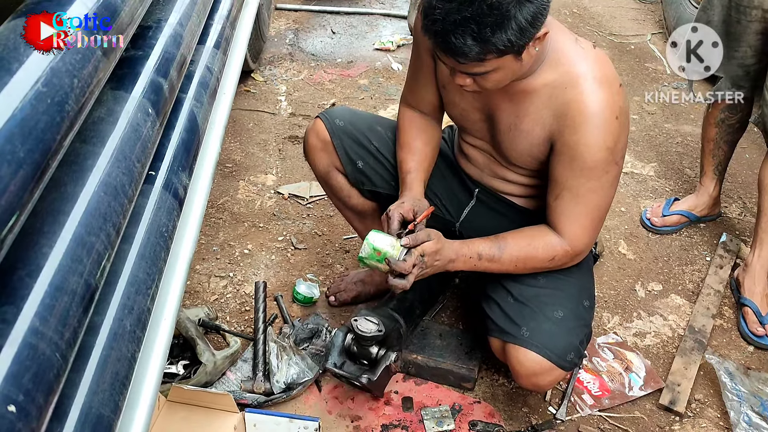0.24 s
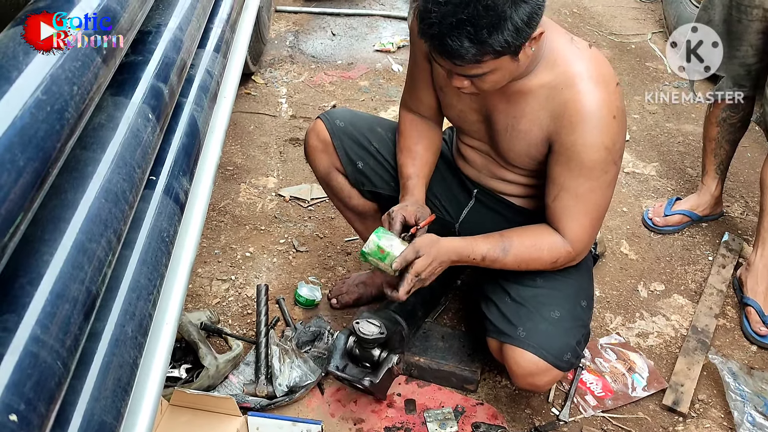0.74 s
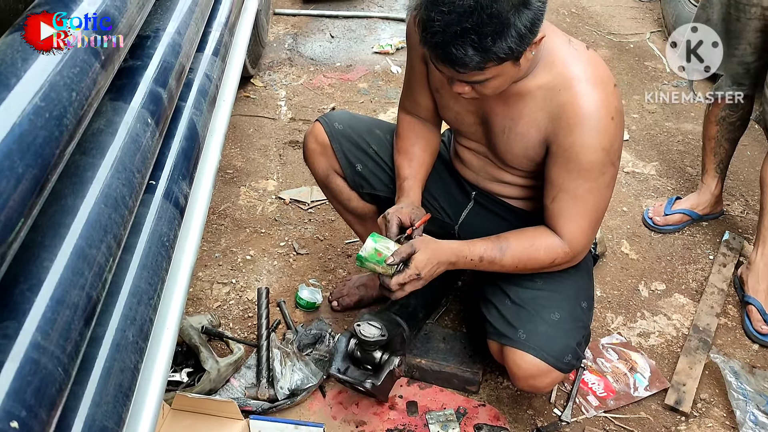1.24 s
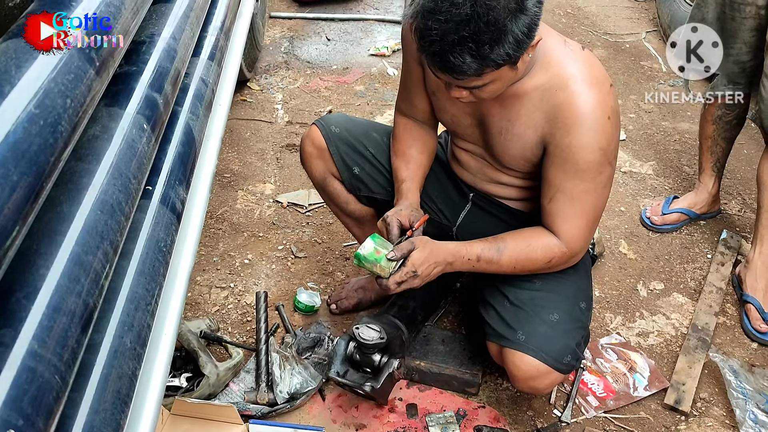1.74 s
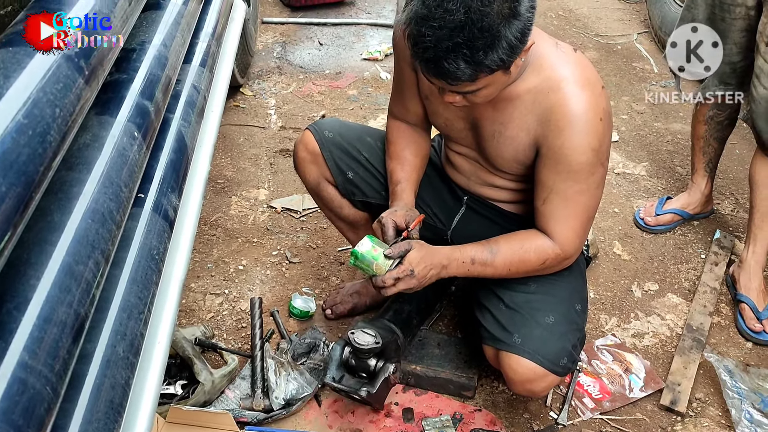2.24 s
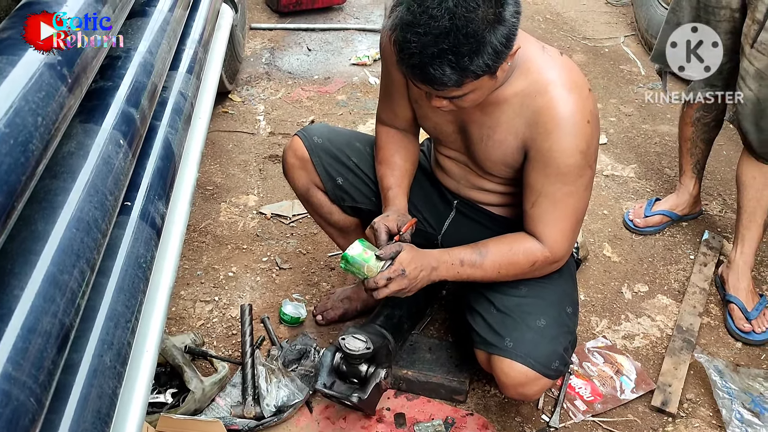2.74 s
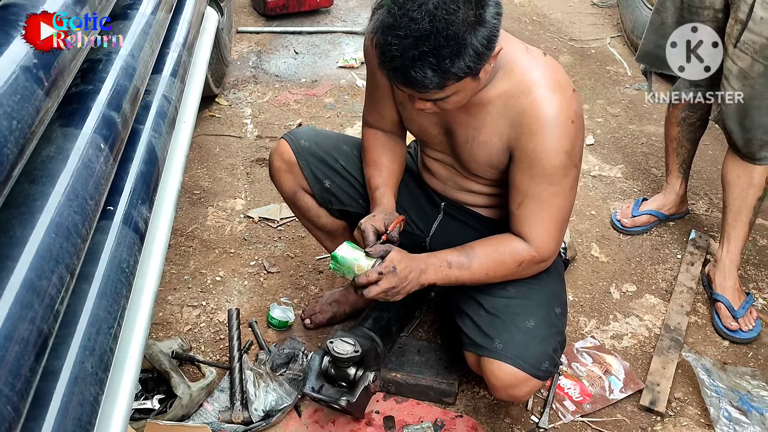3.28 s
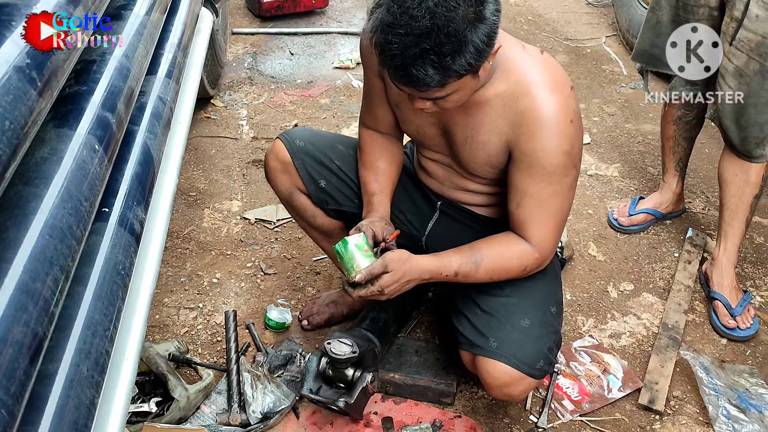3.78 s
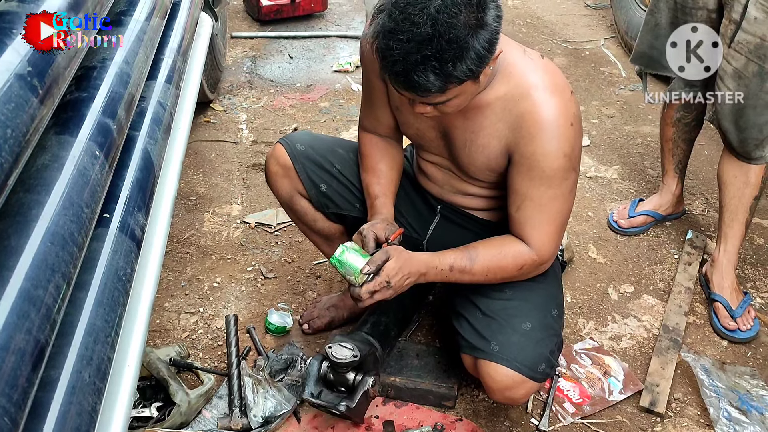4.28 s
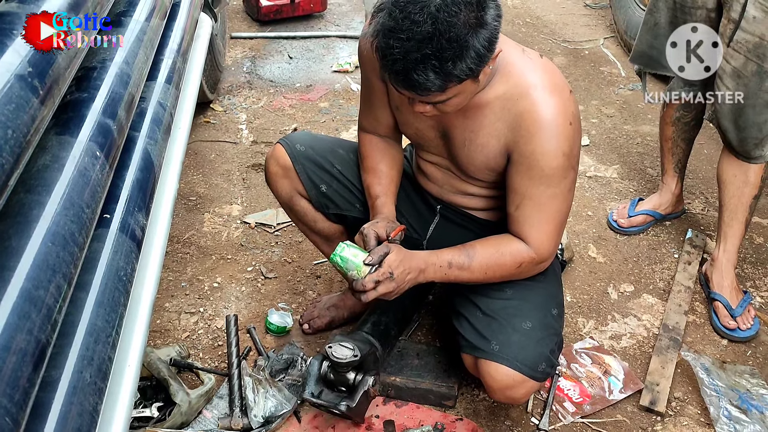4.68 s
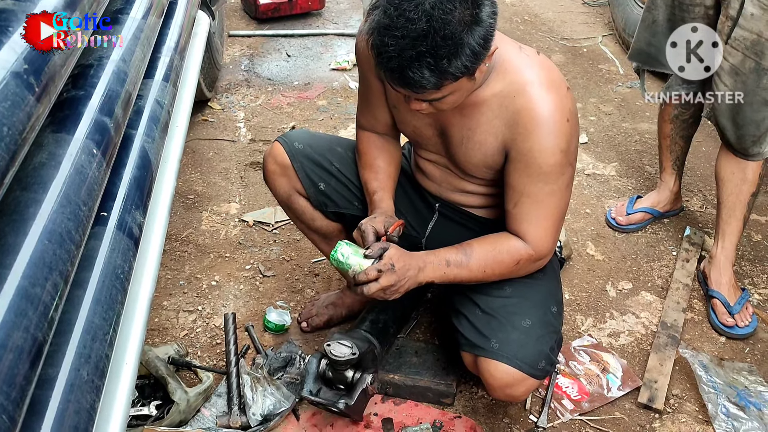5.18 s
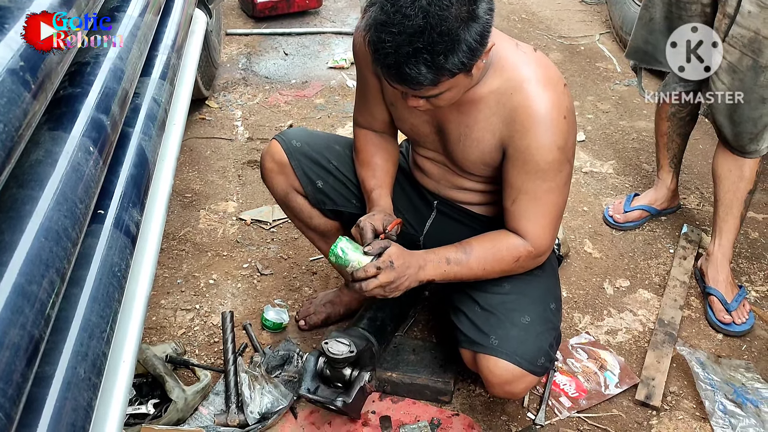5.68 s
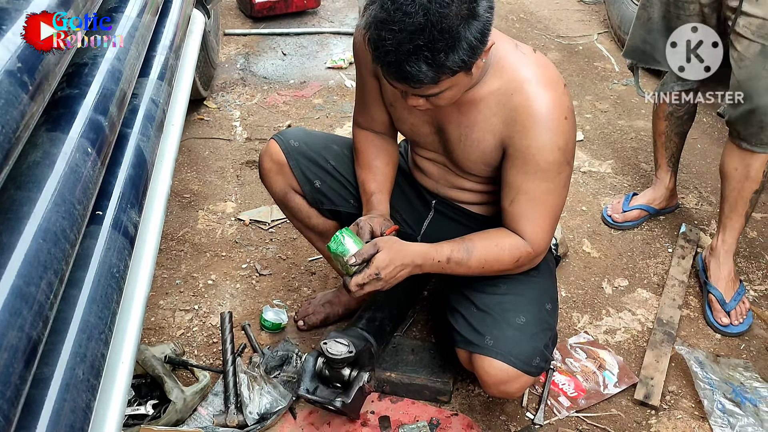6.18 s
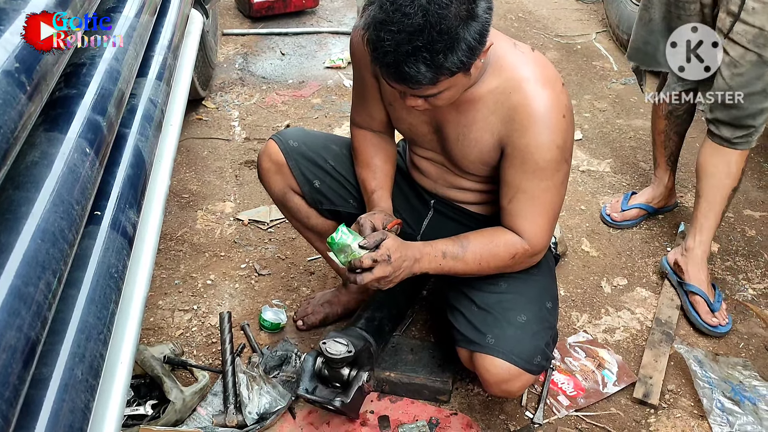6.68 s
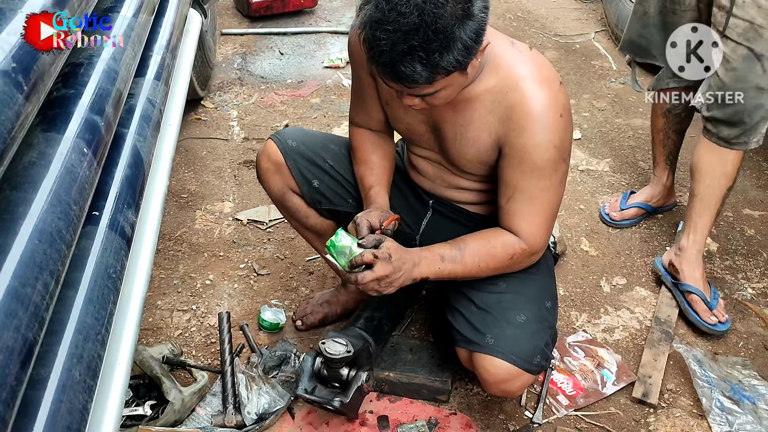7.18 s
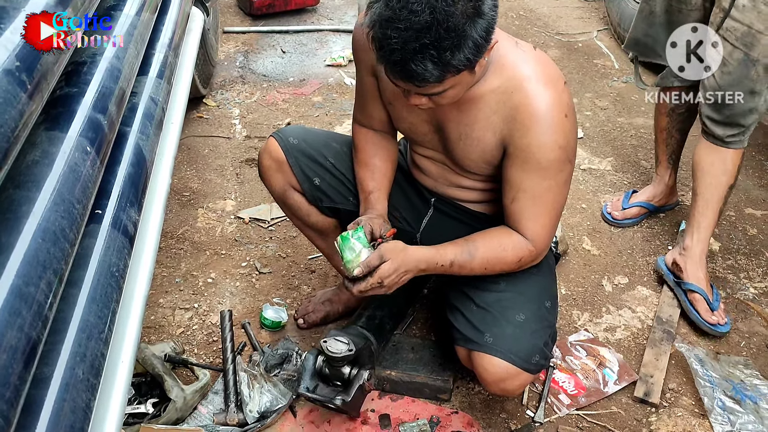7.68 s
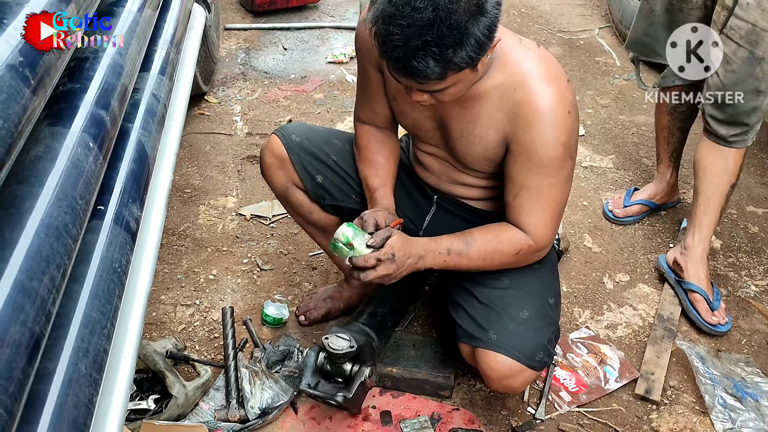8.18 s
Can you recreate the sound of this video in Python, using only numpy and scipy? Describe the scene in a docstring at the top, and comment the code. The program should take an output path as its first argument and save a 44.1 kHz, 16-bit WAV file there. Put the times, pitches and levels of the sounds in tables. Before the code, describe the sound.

Hand scissors snip and crunch a thin metal drink can in irregular bursts, loudest later, over faint traffic rumble, with one brief distant horn honk.

```python
"""Hand scissors cut up a thin drink can in a yard, over filtered-noise traffic and a wavering low hum.
From the start the sheet snaps and soon crunches: noise bursts ring its modes, then the can, and walls answer.
A vehicle swells by as dull noise, small ticks follow, and a distant horn honks once on two notes.
Later the wall pops in with dull thuds, a blade squeaks with a rising pitch, and the long last cut
scrapes as uneven noise with pinging burrs."""
import sys
import numpy as np
from scipy import signal
from scipy.fft import rfft, irfft, next_fast_len
from scipy.io import wavfile

SR = 44100
rng = np.random.default_rng(int(sys.argv[2]) if len(sys.argv) > 2 else 0)


def output_pcm(signal):
    """Save a mono or channel-first signal as 16-bit PCM at the path in sys.argv[1].

    Samples are clipped to [-1, 1] before scaling.
    """
    pcm = np.clip(np.atleast_2d(signal).T, -1, 1) * 32767
    wavfile.write(sys.argv[1], SR, np.round(pcm).astype(np.int16))


N = 371763
TIME = np.arange(N) / SR


def from_db(db):
    """Turn decibels into a gain."""
    return 10 ** (np.asarray(db) / 20)


def rms_one(x):
    """Scale a sound to an rms of 1."""
    return x / np.sqrt(np.mean(x ** 2) + 1e-20)


def in_time(rows):
    """Draw straight lines between the points of a table, giving a value at every sample."""
    return np.interp(TIME, *np.transpose(rows))


def in_time_or_silent(times, level_db):
    """Gain that follows a level curve [dB] and is practically silent outside it."""
    return from_db(np.interp(TIME, times, level_db, left=-200, right=-200))


def at_hz(points, hz):
    """Read a spectrum table on a log-frequency axis."""
    points = np.array(points)
    return np.interp(np.log(hz + 1e-9), np.log(points[:, 0]), points[:, 1])


def band(x, low, high, order=2):
    """Keep the frequencies between low and high [Hz]."""
    sos = signal.butter(order, [low, min(high, .48 * SR)], "band", fs=SR, output="sos")
    return signal.sosfilt(sos, x + 1e-18)


def add(out, s, sound):
    """Mix a stereo sound in at time s [s], trimmed to fit."""
    start = round(s * SR)
    first, last = max(start, 0), min(start + sound.shape[1], N)
    out[:, first:last] += sound[:, first - start:last - start]


def drift(rate):
    """Random wandering with spread 1, taking a new value rate times a second."""
    knots = rng.standard_normal(2000)
    return rms_one(np.interp(TIME * rate, np.arange(len(knots)), knots))


def resonate(x, hz, width):
    """Ring one resonance of a given width [Hz], with gain 1 at its peak."""
    r = np.exp(-np.pi * width / SR)
    top = (1 - r * r) / 2 * np.array([1, 0, -1])
    return signal.lfilter(top, [1, -2 * r * np.cos(2 * np.pi * hz / SR), r * r], x)


# how alike noise is at the left and right: (frequency [Hz], correlation)
STEREO_LIKENESS = [(60, 0.95), (150, 1), (300, 0.9), (600, 0.66), (1200, -0.38), (5000, 0.062)]


def coloured_noise(spectrum):
    """Stereo noise with a given spectrum, alike in the bass and nearly unrelated in the treble."""
    size = next_fast_len(N)
    hz = np.fft.rfftfreq(size, 1 / SR)
    mid, side = rfft(rng.standard_normal((2, size)))
    alike = np.clip(at_hz(STEREO_LIKENESS, hz), -.99, .99)
    pair = np.sqrt(1 + alike) * mid + np.sqrt(1 - alike) * side * [[1], [-1]]
    shaped = pair * from_db(at_hz(spectrum, hz)) * hz / (hz + 10)   # the last factor thins the deepest bass
    return rms_one(irfft(shaped, size)[:, :N])


# colour of the traffic rumble: (frequency [Hz], relative level [dB per Hz])
TRAFFIC_COLOUR = [(12, -21.5), (20, 6.5), (38, 2), (118, -5), (152, -4.5), (243, -10.5), (283, -19.5),
                  (330, -20), (430, -16.5), (730, -120)]
# colour of the thin outdoor hiss: (frequency [Hz], relative level [dB per Hz])
AIR_COLOUR = [(12, -42), (20, -30.5), (48, 17.5), (162, -15), (232, -9.5), (438, -24.5), (739, -30),
              (922, -26.5), (1390, -31.5), (2850, -39.5), (3970, -43), (6700, -49.5), (9590, -56),
              (13300, -40.5), (14500, -39)]
TRAFFIC_DB, AIR_DB = -47.5, -60   # average levels


def outdoors():
    """Far traffic is low noise that swells gently; outdoor air is a thin hiss above it."""
    rumble = rms_one(band(coloured_noise(TRAFFIC_COLOUR), 15, 307, order=4))
    rumble = from_db(TRAFFIC_DB + 1.3 * drift(8.0)) * rumble
    air = rms_one(band(coloured_noise(AIR_COLOUR), 313, 11000, order=3))
    air = from_db(AIR_DB + .5 * drift(6.1)) * air
    return rumble + air


# strength of the distant engine's hum: (time [s], level [dB])
ENGINE_HUM_LEVEL = [(0, -61), (4.0, -68.5), (4.6, -56), (6.8, -61), (8.43, -65)]
HUM_HZ, HUM_WANDER = 168.6, 0.02485   # middle pitch; spread of the pitch as a fraction of it


def hum():
    """One low note of a far engine wavers in pitch and strength."""
    phase = 2 * np.pi * np.cumsum(HUM_HZ * (1 + HUM_WANDER * drift(12))) / SR
    return from_db(in_time(ENGINE_HUM_LEVEL) + 1.0 * drift(7.1)) * np.sin(phase)


# blades sliding on the sheet in the long last cut: (time [s], level [dB])
SLIDE_LEVEL = [(6.08, -72), (6.84, -54.5), (7.27, -74), (7.43, -80), (7.58, -60), (8.23, -97), (8.43, -44)]
# colour of the rubbing: (frequency [Hz], relative level [dB per Hz])
RUB_COLOUR = [(290, -33.5), (500, 0.5), (1030, -38), (1120, 0), (1730, -1), (2420, 1.5), (3910, -8.5),
              (6590, -7), (14500, -24.5)]
# before the slide, the can only shifts faintly in the fingers
HANDLING_DB, HANDLING_SWING_DB, HANDLING_CHANGES_PER_S = -69.5, 3, 8
BURRS_PER_S, BURR_SPREAD_DB = 25, 5.5   # average rate at each pitch; spread of their sizes


def slide():
    """Steel scrapes along the cut edge with uneven grip and catches on burrs, which ping."""
    grip_db = 1.0 + 0.52 * drift(49) + 3.03 * drift(200)
    rub = from_db(grip_db) * coloured_noise(RUB_COLOUR)
    burrs = np.zeros((2, N))
    sizes = from_db(BURR_SPREAD_DB * np.minimum(rng.exponential(1, N), 2))
    for hz in np.geomspace(1100, 5500, 16):
        catches = (rng.random(N) < BURRS_PER_S / SR) * sizes
        ping = resonate(catches, hz * rng.uniform(.95, 1.05), 40)
        burrs += rng.uniform(.3, 1, (2, 1)) * rng.choice([-1, 1], (2, 1)) * ping
    slide_start = SLIDE_LEVEL[0][0]
    handling_db = HANDLING_DB + HANDLING_SWING_DB * drift(HANDLING_CHANGES_PER_S)
    level_db = np.where(TIME < slide_start, handling_db, in_time(SLIDE_LEVEL))
    return from_db(level_db) * (rub + from_db(2.0) * rms_one(burrs) * (TIME > slide_start))


def flex(shake, wall_hz, flap_hz):
    """Grip and cut change the shape of the sheet, so its wall and loose flap ring differently every time."""
    wall = resonate(shake, wall_hz, 110)
    flap = resonate(shake, flap_hz, 290)
    out = shake + from_db(8) * wall + from_db(8.5) * flap
    for hz in np.geomspace(2200, 13000, 9) * np.exp(.12 * rng.standard_normal(9)):
        out = out + from_db(6.5) * resonate(shake, hz, 105)
    return out


# borders between the body, can, edge and fizz ranges: (frequency [Hz])
RANGE_EDGES_HZ = [300, 850, 2000, 7000, 15500]
# A sharp break puts its energy into fizz, a blunt buckle into the can.
# starting levels of the can, edge and fizz ranges, relative to the cut: (level [dB])
RANGE_LEVELS_DB = [-4, 0.5, -12]
# how sharpness changes those ranges: (level gained per dB of sharpness [dB])
SHARPNESS_EFFECT = [-0.78, 0.023, 1.195]
BODY_DB, BODY_FOLLOWS = -44.5, 0.4   # the hand damps the low body, which grows little with the level
LEAD_S = .1   # a fracture peaks this long after its start


def fracture(row, swell, grain_db, after_db, after_t60, band_db):
    """A run of tiny slips shakes the dense modes of the sheet, swelling to a peak and then dying away."""
    level_db, sharpness_db, wall_hz, flap_hz, t60 = row
    body_db = BODY_DB + BODY_FOLLOWS * level_db
    upper_db = level_db + np.add(RANGE_LEVELS_DB, sharpness_db * np.array(SHARPNESS_EFFECT))
    levels_db = np.add([body_db, *upper_db], band_db)
    t = np.arange(SR // 2) / SR - LEAD_S
    since = np.maximum(t, 0)
    # a main fall and a weaker aftermath
    fall = np.hypot(from_db(-60 * since / t60), from_db(after_db - 60 * since / after_t60))
    shape = np.exp(np.minimum(t, 0) / max(swell, 1e-4)) * fall
    grain = np.interp(np.arange(len(t)) / 50, np.arange(500), rng.standard_normal(500))
    slips = from_db(grain_db * grain)
    shake = flex(rng.standard_normal((2, len(t))) * slips * shape, wall_hz, flap_hz)
    parts = zip(levels_db, RANGE_EDGES_HZ, RANGE_EDGES_HZ[1:])
    mix = sum(from_db(db) * rms_one(band(shake, low, high, order=4)) for db, low, high in parts)
    return mix * np.sqrt(np.mean(shape ** 2))


CRACK_DB = 7.5   # force of the first click, relative to the level of the cut


def crack(force_db):
    """The instant at which the metal gives: a click of about a millisecond."""
    t = np.arange(SR // 200) / SR
    click = band(rng.standard_normal((2, len(t))), 1200, 12000)
    return from_db(force_db - 31.5 - 60 * t / 0.0031) * click


# the sheet snaps: (time [s], level [dB], sharpness [dB], wall pitch [Hz], flap pitch [Hz],
# time of the main fall by 60 dB [s])
SHEET_SNAPS = [(.002, -44, -0.5, 955, 3120, .11), (0.214, -44, 0, 1620, 5070, 0.16),
               (.432, -47, -10.5, 990, 2820, .07), (.65, -52.5, 2, 1470, 2620, 0.11),
               (1.122, -38, 7, 940, 7000, 0.075), (1.394, -53.5, -10, 930, 3160, 0.17),
               (1.455, -37, -0.5, 1660, 3720, 0.055), (1.699, -35, 1, 1660, 3280, 0.08),
               (1.746, -24, 8.5, 920, 3880, 0.032), (1.814, -46.5, -6.5, 980, 2830, 0.18),
               (1.984, -47.5, 13.5, 1840, 4960, 0.066), (2.057, -31, 6.5, 1790, 2500, .09),
               (2.74, -52, -10, 920, 3500, .085), (2.788, -50, -7.5, 1060, 2760, 0.11),
               (2.815, -44.5, -13.5, 2080, 2250, 0.18), (2.863, -49, 9.5, 940, 2030, 0.13),
               (3.006, -42.5, 1.5, 1050, 2610, .07), (3.104, -38.5, -6, 1100, 2570, 0.2),
               (3.151, -34, -1, 1090, 3780, 0.084), (3.197, -36, -11.5, 1190, 3050, 0.081),
               (3.271, -27.5, 1.5, 2020, 3770, 0.07), (3.342, -35.5, 8, 2100, 5060, 0.029),
               (3.573, -38, 6.5, 1080, 4240, 0.064), (3.601, -28.5, 4, 1180, 3720, .1),
               (4.417, -41.5, 5, 1520, 5460, 0.027), (4.459, -49.5, 7, 1130, 6310, 0.046),
               (4.503, -36.5, 4, 1120, 2100, 0.086), (4.799, -34, 3, 2100, 3420, 0.04),
               (5.255, -39, -13, 1570, 3020, 0.054), (5.432, -17.5, 9, 2110, 4270, 0.036),
               (5.692, -41, -14, 1136, 2170, 0.39), (5.713, -22.5, 9.5, 1170, 3340, 0.075),
               (5.744, -25.5, 7.5, 1970, 2030, 0.12), (5.841, -15.5, 9.5, 1734, 5240, 0.037),
               (6.392, -32, 2.5, 1920, 3860, 0.018), (6.49, -43.5, -11, 1190, 2500, 0.029),
               (6.527, -47.5, -4, 2000, 4280, 0.034), (6.606, -39, 2.5, 1340, 2520, 0.086),
               (6.714, -29.5, 4, 1240, 4150, .11), (6.899, -48.5, 10.5, 1600, 4730, 0.046),
               (7.0, -32, 3.5, 1130, 4800, 0.11), (7.4, -28, 6.5, 1570, 4740, 0.089),
               (7.409, -21.5, 11, 1720, 4360, 0.078), (7.518, -40.5, 2.5, 1125, 4200, .1),
               (7.569, -41, 5.5, 1110, 6560, 0.052), (7.623, -37.5, 4, 1140, 6200, 0.058),
               (7.745, -43.5, 3.5, 1430, 2540, 0.36), (7.855, -43.5, 3, 1250, 3830, 0.51),
               (8.089, -43, 2, 975, 3450, 0.034), (8.228, -25.5, 0.5, 1560, 6500, 0.17)]


def snaps():
    """The metal gives way suddenly: a click and a fracture that swells in about a millisecond."""
    out = np.zeros((2, N))
    for s, *row in SHEET_SNAPS:
        snap = fracture(row, swell=0.00097, grain_db=1.0, after_db=-7, after_t60=0.11,
                        band_db=[6.8, 1.34, -0.53, -1.1])
        add(out, s - LEAD_S, snap)
        add(out, s, crack(row[0] + CRACK_DB))
    return out


# resonances of the can and blades: (frequency [Hz], width before a lower limit [Hz], level [dB])
CAN_RESONANCES = [(916, 8.1, 8), (1114.3, 27.4, 4.5), (1330, 55, -1.5), (1510, 63, -4.5), (1634, 20, 6.5),
                  (1970, 17, -20), (2462, 22, -3.5), (2680, 25, -5.5), (2933, 50, 5.5), (3439, 124, 6),
                  (4510, 38, -17), (4460, 146, 7.5), (5396, 85, 0), (6380, 85, -17), (6735, 67, 2),
                  (7300, 100, -36)]


def can(shake):
    """The shaken can rings at its resonances, each heard slightly later on the right."""
    out = 0.9 * shake
    for k, (hz, width, db) in enumerate(CAN_RESONANCES):
        ring = resonate(shake[k % 2], hz, max(width, hz / 75))   # left and right drive them in turn
        late = np.interp(TIME - .00078, TIME, ring)
        out += from_db(db) * np.array([ring, late])
    return out


def yard(x, wet_db, t60, dull_hz):
    """Walls and clutter scatter a faint, duller tail."""
    t = np.arange(SR) / SR
    echoes = band(rng.standard_normal((2, SR)), 320, dull_hz, order=1)
    echoes = echoes * from_db(-60 * t / t60) * (1 - np.exp(-t / 0.0017))
    tail = signal.fftconvolve(x, rms_one(echoes) / np.sqrt(SR), axes=1)[:, :N]
    return x + from_db(wet_db) * tail


# the sheet crumples: (time [s], level [dB], sharpness [dB], wall pitch [Hz], flap pitch [Hz],
# time of the main fall by 60 dB [s], swell time [s])
SHEET_CRUNCHES = [(.774, -59, 2, 1470, 2200, .27, .007), (.888, -58.5, -2.5, 995, 2050, 0.13, 0.0087),
                  (2.454, -62.5, -2, 1360, 2320, 0.22, .007), (2.941, -55.5, -1, 945, 2300, 0.07, 0.0034),
                  (3.701, -55, -1.5, 1120, 4270, 0.32, 0.0043), (4.654, -51.5, 0.5, 1530, 3900, 0.15, .015),
                  (4.924, -54.5, -3, 1060, 3700, 0.16, 0.011), (5.088, -37, 6, 1560, 5450, 0.082, 0.012),
                  (5.417, -60.5, -21.5, 1065, 3000, 0.089, 0.0023),
                  (5.471, -31.5, 0, 1610, 2760, 0.095, 0.0061), (6.241, -48, 0.5, 1120, 6000, 0.26, 0.04),
                  (6.803, -40.5, 3.5, 1100, 4200, 0.14, 0.012), (7.146, -48.5, 3, 1130, 4020, 0.16, 0.0081),
                  (7.392, -43.5, 5, 1140, 4300, 0.026, 0.0036), (7.424, -30.5, 5, 1610, 3400, 0.26, 0.0076),
                  (7.637, -39.5, 1, 1500, 2460, 0.31, 0.0057),
                  (8.247, -23.5, 11.5, 1150, 6140, 0.092, 0.0046)]


def crunches():
    """The metal folds more slowly: a swelling, grainier fracture with a click at its peak."""
    out = np.zeros((2, N))
    for s, *row, swell in SHEET_CRUNCHES:
        crunch = fracture(row, swell, grain_db=3.0, after_db=-32.5, after_t60=0.312,
                          band_db=[5, 3.5, -1.0, 1.5])
        add(out, s - LEAD_S, crunch)
        add(out, s, crack(row[0] + CRACK_DB))
    return out


# a vehicle swells briefly in the distance: (time [s], level [dB])
PASSING_LEVEL = [(.9, -70), (1.15, -54.5), (1.3, -53), (1.55, -89)]
# colour of its noise: (frequency [Hz], relative level [dB per Hz])
VEHICLE_COLOUR = [(90, -25), (170, -5), (250, -4), (330, -11), (520, -20), (640, -14), (800, -30),
                  (1500, -64)]


def passing():
    """A dull swell of engine and tyre noise."""
    return in_time_or_silent(*np.transpose(PASSING_LEVEL)) * coloured_noise(VEHICLE_COLOUR)


# tiny dry ticks: (time [s], relative level [dB])
TICK_TIMES = [(2.5534, -41), (3.5543, -54), (3.7314, -51), (4.2982, -22.5), (4.3112, -31), (4.6975, -47)]


def ticks():
    """Small, bright contacts that ring one high resonance and die at once."""
    out, t = np.zeros((2, N)), np.arange(SR // 20) / SR
    for s, db in TICK_TIMES:
        contact = band(rng.standard_normal((2, len(t))), 4000, 12000)
        contact = contact * from_db(db - 3.5 - 60 * t / 0.0093)
        add(out, s, contact + 4.5 * resonate(contact, 6060, 700))
    return out


# the two notes of the distant horn: (pitch [Hz])
HORN_NOTES_HZ = [403, 477]
# rise and fall of the honk: (time [s], relative level [dB])
HONK_LEVEL = [(3.29, -110), (3.34, -64.5), (3.44, -65.5), (3.53, -75), (3.7, -110)]
# colour of the horn's flare: (frequency [Hz], relative level [dB])
FLARE_COLOUR = [(410, 1), (900, -3), (1400, -2.5), (1950, 1), (2500, 0), (3000, -5), (4400, -18)]


def horn():
    """Two buzzing diaphragms about a minor third apart; over the distance each overtone fades by itself."""
    out = np.zeros((2, N))
    level_db = in_time(HONK_LEVEL)
    on = level_db > level_db.min() + 1
    for hz in HORN_NOTES_HZ:
        phase = 2 * np.pi * np.cumsum(hz * (1 + .004 * drift(35)[on])) / SR
        for k in range(1, 9):
            fading_db = 3.5 * drift(18)[on]
            gain = from_db(level_db[on] + at_hz(FLARE_COLOUR, k * hz) + 3.0 + fading_db)
            out[:, on] += gain * np.sin(k * phase + rng.uniform(0, np.pi, (2, 1)))
    return out


# the wall pops in under the grip: (time [s], relative level [dB])
WALL_THUDS = [(4.503, -47.5), (5.08, -43), (6.606, -77.5), (6.714, -43.5), (7.409, -41.5), (8.241, -42.5)]
THUD_LOW_HZ, THUD_HIGH_HZ, THUD_T60_S = 283, 795, 0.12   # T60: time to fall by 60 dB


def thuds():
    """A broad patch of the wall flips inwards with a dull thud; the hand damps it at once."""
    out, t = np.zeros((2, N)), np.arange(SR // 4) / SR
    for s, db in WALL_THUDS:
        pop = rms_one(band(rng.standard_normal(len(t)), THUD_LOW_HZ, THUD_HIGH_HZ))
        shape = (1 - np.exp(-t / 0.00067)) * from_db(db - 60 * t / THUD_T60_S)
        add(out, s, pop * shape * from_db([[-2], [2]]))   # stronger on the right
    return out


# a blade squeaks on the cut edge: (time [s], middle pitch [Hz], level [dB])
BLADE_SQUEAK = [(5.461, 1245, -58.5), (5.47, 1466, -31), (5.472, 1557, -21.5), (5.484, 1590, -31),
                (5.5, 1630, -68)]


def squeak():
    """Stick and slip speed up as the blades close, so the unsteady pitch rises."""
    times, pitch, level_db = np.transpose(BLADE_SQUEAK)
    unsteady_hz = np.interp(TIME, times, pitch) * (1 + 0.0247 * drift(230))
    phase = 2 * np.pi * np.cumsum(unsteady_hz) / SR
    return in_time_or_silent(times, level_db) * (np.sin(phase) + 0.18 * np.sin(2 * phase))


def scene():
    """The work and the horn lean a little to the right, over the outdoor sounds."""
    shake = snaps() + crunches() + slide()
    work = yard(can(shake) + squeak(), wet_db=-14.5, t60=0.22, dull_hz=5600)
    work = work + ticks() + thuds()
    return (work + horn()) * from_db([[-1.8], [1.3]]) + outdoors() + hum() + passing()


CUTOFF_HZ = 14600


def record(dry):
    """A steep low-pass filter removes the very highest treble."""
    return signal.sosfilt(signal.ellip(10, .3, 80, CUTOFF_HZ, fs=SR, output="sos"), dry)


dry = scene()
out = record(dry)
output_pcm(out)
```